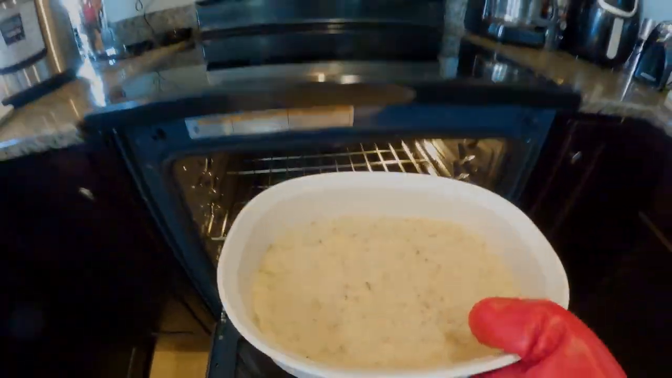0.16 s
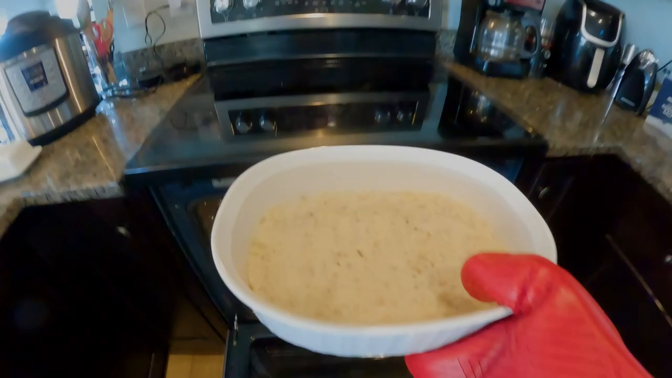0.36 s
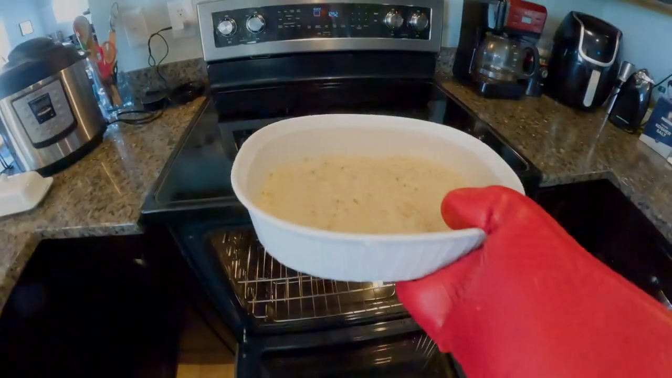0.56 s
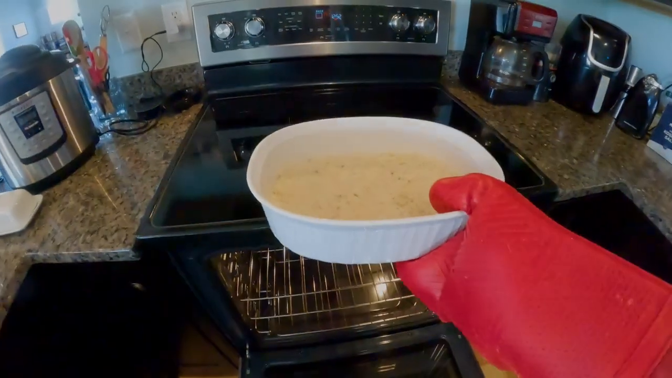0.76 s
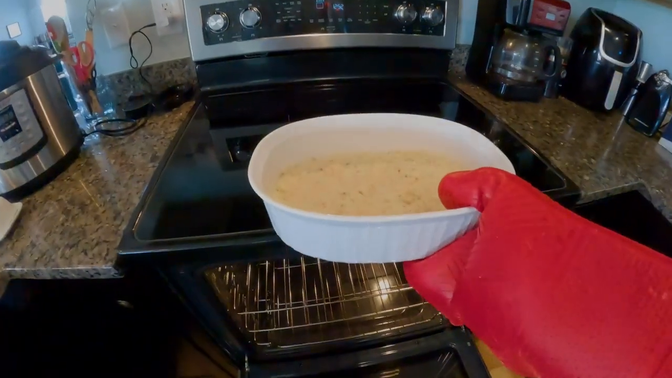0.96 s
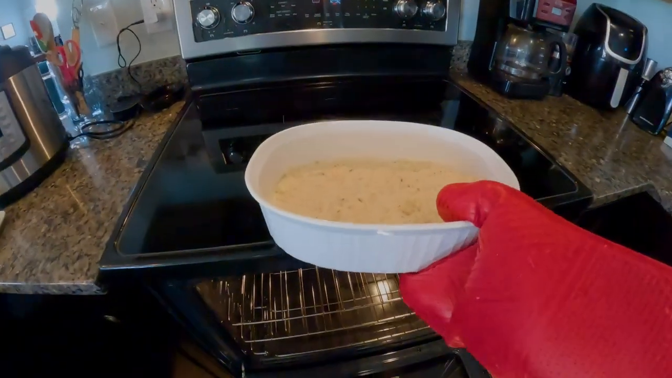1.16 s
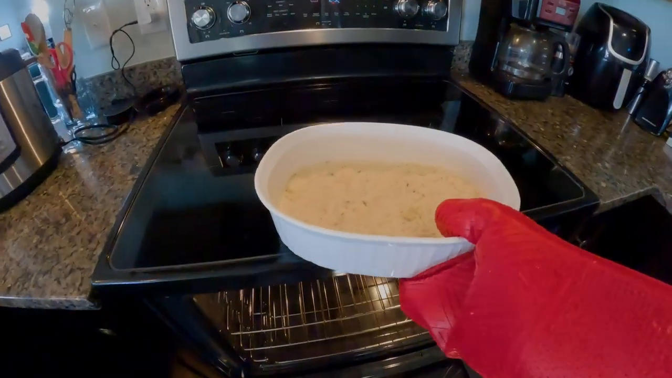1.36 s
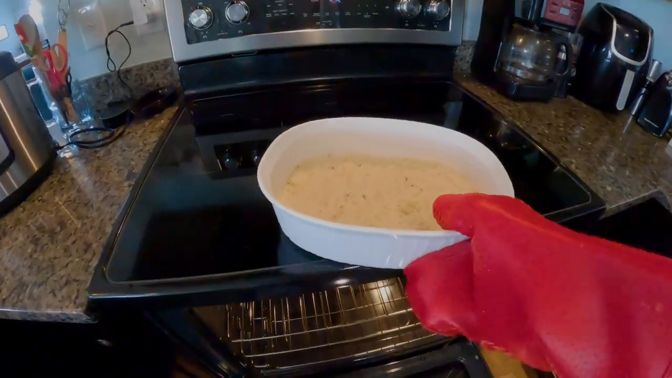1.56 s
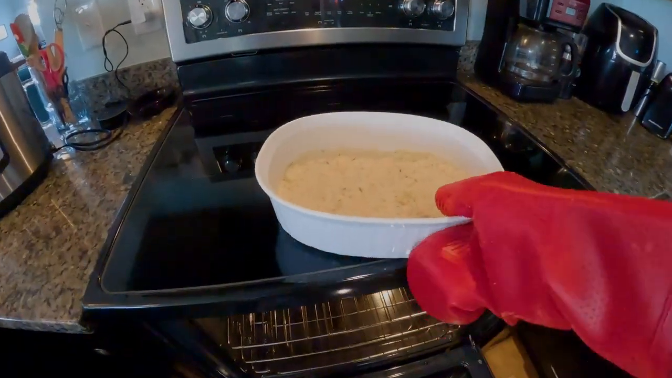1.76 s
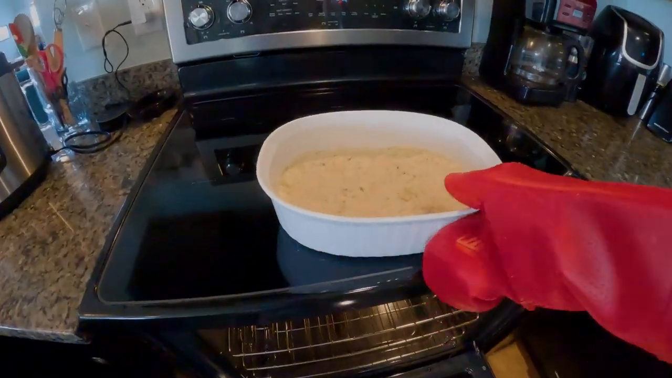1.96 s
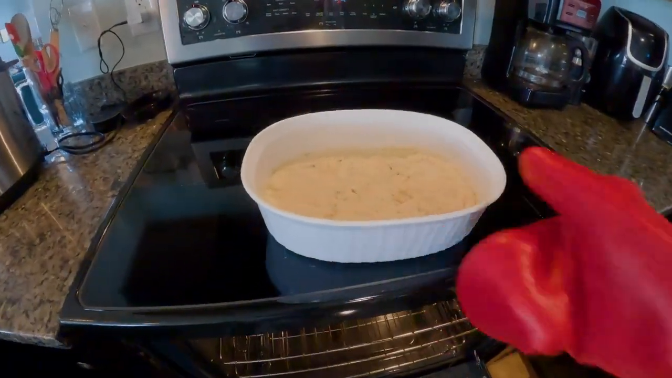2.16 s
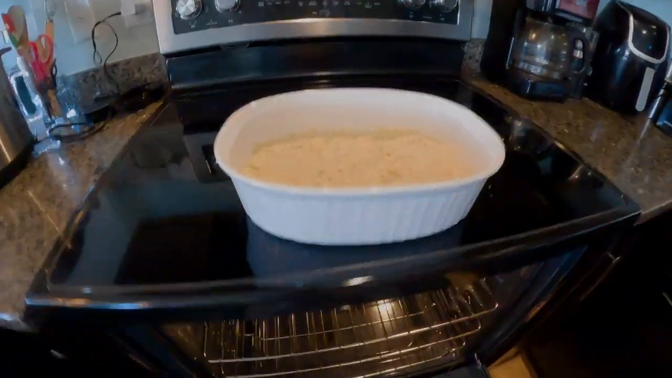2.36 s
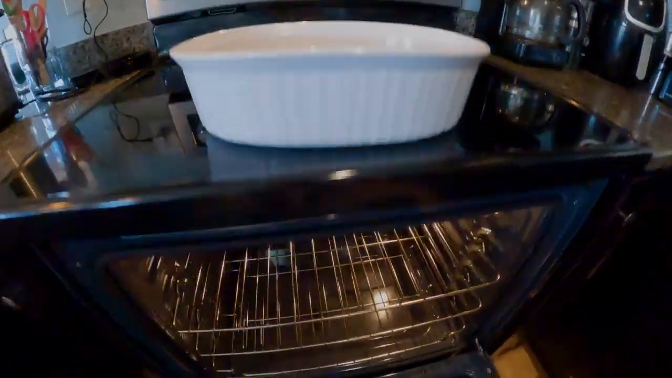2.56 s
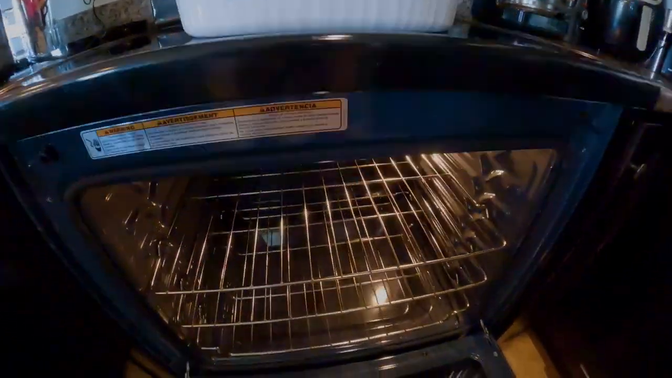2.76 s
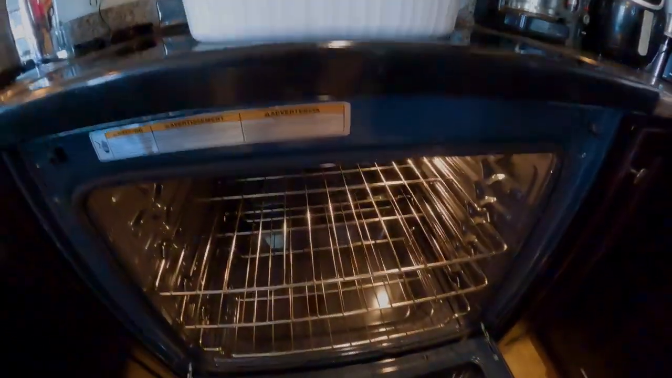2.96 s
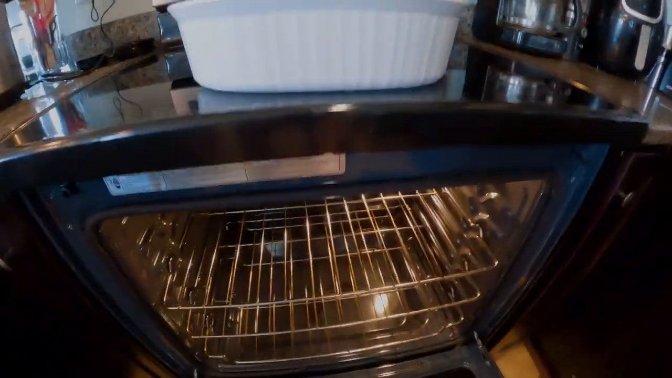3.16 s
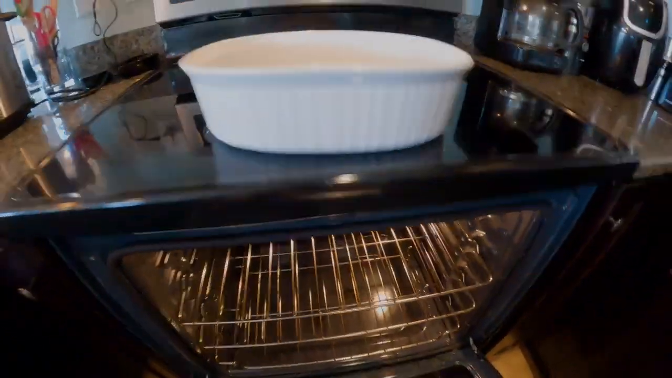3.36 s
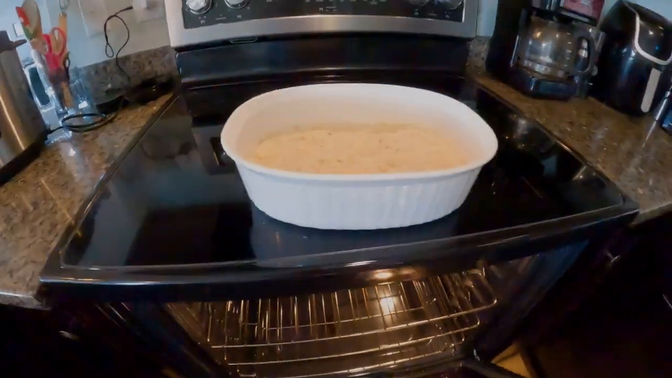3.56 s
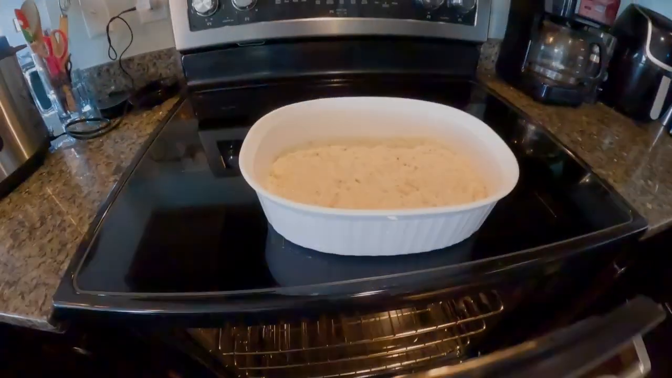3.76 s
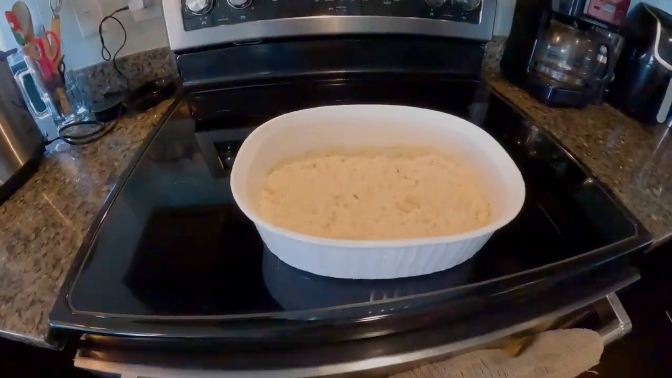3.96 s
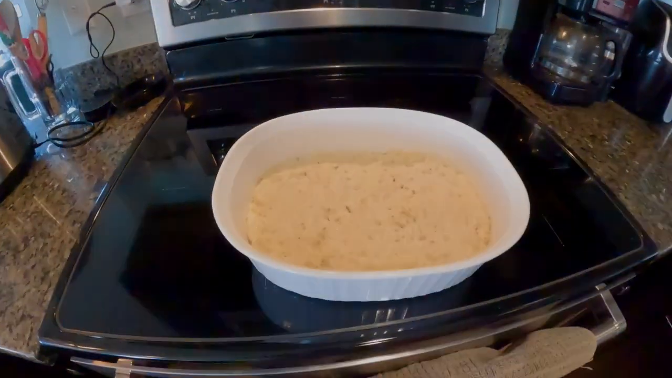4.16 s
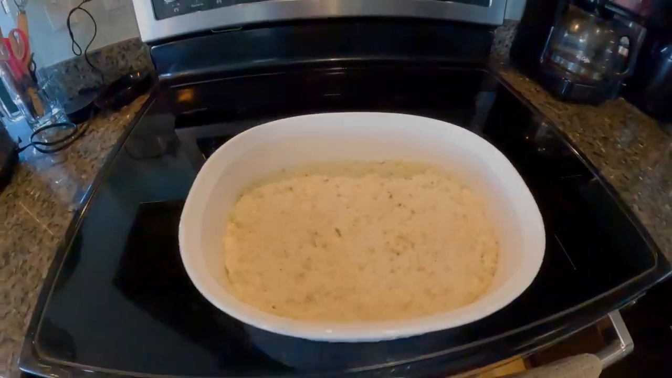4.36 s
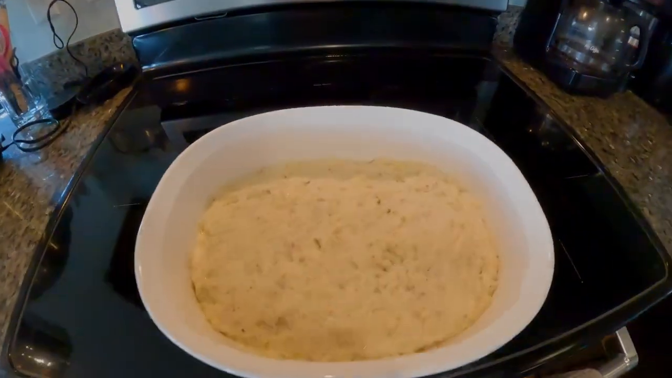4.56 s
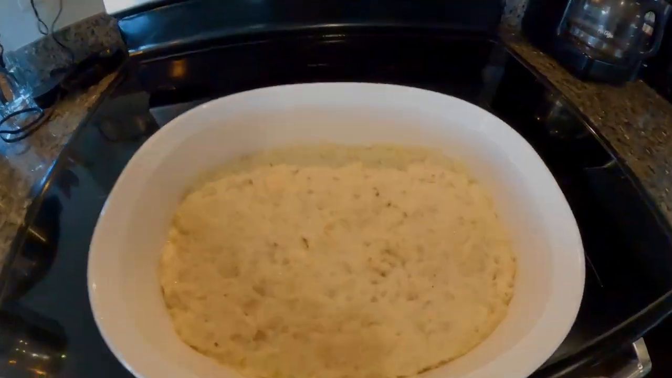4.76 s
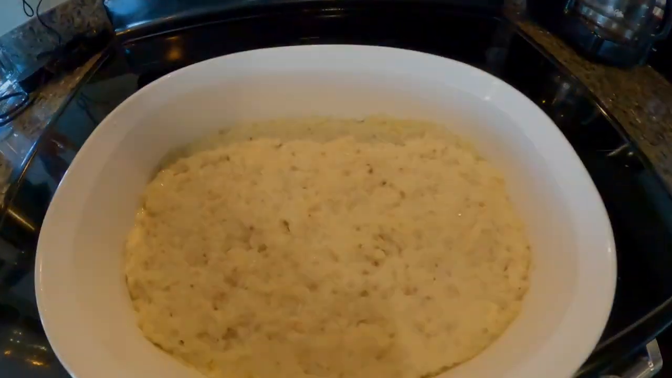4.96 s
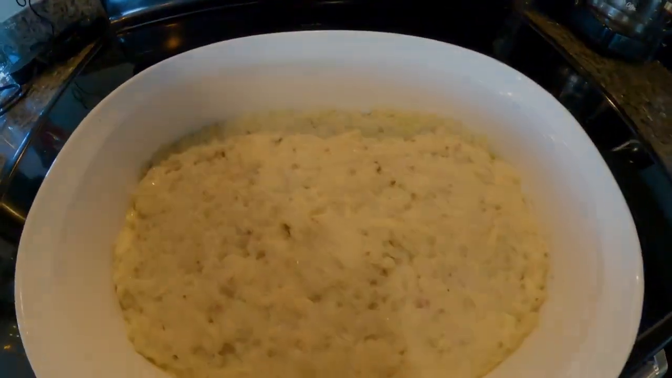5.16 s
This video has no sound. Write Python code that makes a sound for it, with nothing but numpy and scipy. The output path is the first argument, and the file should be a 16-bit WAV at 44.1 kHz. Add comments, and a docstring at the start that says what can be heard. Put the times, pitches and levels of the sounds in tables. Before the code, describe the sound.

A wire oven rack rings and fades, with faint ticks as a ceramic dish is carried away. The dish lands on a glass cooktop with a sharp knock, scrapes briefly and rocks with a few more knocks. Then the oven door's hinge clacks, and the door rattles and shuts with a deep push of air. A body-worn microphone hears it up close in a small kitchen, over low rumble, a drone and soft hiss.

```python
"""Dish out of the oven

A wire rack rings out as a ceramic dish is carried from it, ticking faintly. The dish lands, rocks and
slides on a glass cooktop; then the oven door is lifted, its hinge clacks and it shuts with a push of air.
Blows ring the modes of the struck parts; friction is noise through resonances. A body-worn microphone
hears it in a small kitchen, over rumble, a low drone and a hissy wash."""
import sys
import numpy as np
from scipy import signal
from scipy.fft import rfft, irfft, next_fast_len
from scipy.io import wavfile
from scipy.ndimage import map_coordinates

SR = 44100
rng = np.random.default_rng(int(sys.argv[2]) if len(sys.argv) > 2 else 0)


def unload_audio(sound):
    """Save the sound as a 16-bit wav file, at the path given as the first command line argument."""
    columns = np.transpose(np.atleast_2d(sound))
    # keep every value between -1 and 1, then stretch to whole-number steps
    steps = np.round(np.clip(columns, -1, 1) * 32767)
    wavfile.write(sys.argv[1], SR, steps.astype(np.int16))


N = 230598
T = np.arange(N) / SR


def amp(db):
    """Gain of a level in dB."""
    return 10 ** (np.asarray(db) / 20)


def sides(pan_db):
    """Left and right gains; positive pan is left."""
    return amp([[pan_db / 2], [-pan_db / 2]])


def along(points, hz):
    """Interpolates (Hz, value) points on a log axis."""
    f, v = np.transpose(points)
    return np.interp(np.log(hz + 1), np.log(f + 1), v)


def fader(points, outside_db=None):
    """Gain over time from (s, dB) points."""
    return amp(np.interp(T, *np.transpose(points), left=outside_db, right=outside_db))


def swell(centre_s, sigma_s, db):
    """Bell-shaped gain over time."""
    return amp(db) * np.exp(-.5 * ((T - centre_s) / sigma_s) ** 2)


def flicker(db, rate_hz):
    """Smooth random gain, spread by about db."""
    knots = rng.standard_normal(int(N * rate_hz / SR) + 4)
    return amp(db * map_coordinates(knots, [T * rate_hz]))


def filtered(x, response):
    """Applies a gain given as a function of Hz."""
    n = x.shape[-1]
    size = next_fast_len(n + 8192)
    return irfft(rfft(x, size) * response(np.fft.rfftfreq(size, 1 / SR)), size)[..., :n]


def resonance(hz, centre_hz, width_hz):
    """Gain of one resonant peak."""
    return 1 / (1 + (2 * (hz - centre_hz) / width_hz) ** 2)


def band(hz, centre_hz, width_oct):
    """Gain of a flat-topped band."""
    return 1 / (1 + (2 * np.log2((hz + 1) / centre_hz) / width_oct) ** 4)


def peaks(table, hz, floor_db):
    """Gain of (Hz, width, dB) resonances over a floor, rolled off in the bass."""
    resonant = sum(amp(db) * resonance(hz, centre, width) for centre, width, db in table)
    return (amp(floor_db) + resonant) / (1 + (700 / (hz + 1)) ** 2)


def ring(modes, t, spread_db=1.5):
    """Decaying (Hz, dB, t60) sines at scattered strengths."""
    return sum(amp(db + spread_db * rng.standard_normal() - 60 * t / t60) * np.sin(2 * np.pi * hz * t)
               for hz, db, t60 in modes)


def add(out, start_s, x):
    """Mixes x into both channels."""
    span = out[:, round(start_s * SR):][:, :x.shape[-1]]
    span += x[..., :span.shape[1]]


def stereo_noise(n, mid_side_gain):
    """Shaped mid and side noise as left and right, rms 1."""
    mid, side = filtered(rng.standard_normal((2, n)), mid_side_gain)
    x = np.array([mid + side, mid - side])
    return x / np.sqrt(np.mean(x ** 2) + 1e-20)


# Each row: frequency in Hz, left-right correlation.
CORRELATION = [(60, 0.89), (240, 0.97), (950, 0.74), (3770, 0.55), (15000, 1)]
def rush(gain):
    """Scene-long noise, partly alike in both channels."""
    def mid_side_gain(hz):
        angle = np.arccos(np.clip(along(CORRELATION, hz), -1, 1)) / 2
        return gain(hz) * [np.cos(angle), np.sin(angle)]
    return stereo_noise(N, mid_side_gain)


# Each row: frequency in Hz, side against mid in dB.
SIDE_LEVEL = [(60, -21), (110, -34.5), (200, -27), (380, -16), (700, -15), (1290, -12), (2380, -8),
              (4400, -9.5), (8120, -15), (15000, -2)]
def burst(n, gain):
    """n samples of stereo noise, nearly mono in the bass."""
    return stereo_noise(n, lambda hz: gain(hz) * amp([0 * hz, along(SIDE_LEVEL, hz)]))


# Each row: frequency in Hz, level in dB, t60 in seconds.
RACK_MODES = [(668, -12, 7), (791, -14, .6), (921, -19, 1.2), (1120, -14, .7), (1303, -13, 2.2),
              (1461, -15, 5), (2406, -15, .9), (2191, -20, .8), (3068, -15, .9), (3155, -16, .9),
              (3693, -14, .9), (4425, -8, 1.1), (4947, -18, 1), (5044, -15, 1.4), (5701, -19, .8),
              (5862, -15, .9), (5908, -16, .9), (6621, -24, 1.2), (6745, -19, 1), (6880, -19, .9),
              (7337, -18, 2.4), (7472, -18, .8), (8473, -20, .9), (9205, -18, .9), (9394, -17, .8),
              (9690, -17, .9), (10960, -23, .9), (11547, -17, 1.2), (11698, -19, .9), (12457, -17, .8)]
def rack():
    """The rack, struck just before the start: wires of nearly equal length beat as they fade."""
    out, t = np.zeros((2, N)), T[:3 * SR // 2]
    wire = np.arange(10)[:, None]
    for hz, db, t60 in RACK_MODES:
        wire_hz = hz * (1 + .002 * wire * rng.standard_normal(wire.shape))
        level = amp(db - 35 - 7.5 * np.sqrt(wire) - 60 * t * (1 + .15 * wire) / t60)
        tones = level * np.sin(2 * np.pi * (wire_hz * t + rng.uniform(0, 1, wire.shape)))
        pans = sides(1) * amp(2.5 * rng.standard_normal((1, len(wire))) * [[1], [-1]])
        add(out, 0, pans @ tones)
    return out


def rack_ring_and_swell(t60_s=2.56):
    """The rack's narrow 1280 Hz ring fades from the start; a faint tone at that pitch swells later."""
    level = amp(-44.5 - 60 * T / t60_s) + swell(centre_s=2.744, sigma_s=.17, db=-64)
    return level * rush(lambda hz: resonance(hz, 1280, width_hz=22))


# Each row: time in seconds, level in dB.
RUMBLE_LEVEL = [(0.0, -48), (0.03, -37.5), (0.36, -45), (1.35, -41.5), (1.37, -32), (1.53, -44),
                (3.13, -40), (3.16, -30), (3.29, -41), (4.05, -33.5), (4.11, -41), (4.14, -23.5),
                (4.22, -22.5), (4.78, -35.5), (4.81, -34), (5.23, -37)]
# Each row: frequency in Hz, density in dB.
RUMBLE_SPECTRUM = [(8, -36), (15, -0.5), (48, -10.5), (65, -15), (90, -18), (150, -49.5), (300, -120)]
def rumble():
    """Lumpy buffeting on the microphone ports."""
    return fader(RUMBLE_LEVEL) * flicker(2.7, 18) * rush(lambda hz: amp(along(RUMBLE_SPECTRUM, hz)))


# Each row: time in seconds, drone level in dB, wash level in dB.
BACKGROUND_LEVELS = [(0.0, -36.5, -36), (0.49, -51, -62), (0.93, -55.5, -65.5), (1.38, -58, -80),
                     (1.51, -48.5, -33.5), (1.79, -38, -43), (2.04, -51.5, -56), (2.27, -60, -68.5),
                     (2.49, -68.5, -72), (2.74, -61, -63), (3.16, -59, -67.5), (3.29, -48.5, -57),
                     (3.79, -52.5, -55), (3.96, -45, -57), (4.15, -41.5, -56.5), (4.31, -42.5, -48.5),
                     (4.6, -53.5, -70.5), (5.23, -55.5, -64.5)]
# Three spectra. Each row: frequency in Hz, density in dB.
DRONE_SPECTRUM = [(60, -25.5), (110, 1.5), (160, 3), (240, -3.5), (330, -9), (900, -21.5), (1800, -30.5),
                  (3000, -64.5)]
WASH_SPECTRUM = [(300, -46), (900, 0.5), (1700, -0.5), (3000, -9.5), (5000, -13), (9000, -40)]
HISS_SPECTRUM = [(1000, -16), (3000, 6.5), (7000, 5), (12000, 4.5), (16000, -1)]
# Each row: centre in seconds, sigma in seconds, level in dB.
HISS_SWELLS = [(0.951, 0.43, -68), (2.106, 0.12, -54), (2.837, 0.2, -59), (3.635, 0.23, -59.5),
               (4.303, 0.22, -58), (4.75, 0.23, -67)]
def drone_and_wash(hiss_share_db=-13.5, hiss_floor_db=-82):
    """A low drone and a hissy wash linger after the blows, with faint cloth rustle between them."""
    times, *levels = np.transpose(BACKGROUND_LEVELS)
    drone_db, wash_db = (np.interp(T, times, db) for db in levels)
    drone = amp(drone_db) * flicker(1.9, 28) * rush(lambda hz: amp(along(DRONE_SPECTRUM, hz)))
    wash = amp(wash_db) * rush(lambda hz: amp(along(WASH_SPECTRUM, hz)))
    swells = sum(swell(*row) for row in HISS_SWELLS)
    hiss_gain = amp(wash_db + hiss_share_db) + amp(hiss_floor_db) + swells
    hiss = hiss_gain * rush(lambda hz: amp(along(HISS_SPECTRUM, hz)))
    return drone + flicker(1.2, 90) * (wash + hiss)


# Each row: centre in Hz, width in Hz, level in dB.
CAVITY_TONES = [(230.1, 15, -58), (658, 170, -57.5), (658, 2.9, -64), (1446, 51, -63.5)]
# Each row: time in seconds, gain in dB.
OVEN_NEARNESS = [(0, 13), (1.3, -9), (2.2, -11), (2.35, -11.5), (2.7, -14.5), (3.1, -12.5), (4, -2.5),
                 (5.23, -27)]
def oven_hum():
    """Noise in the cavity's resonances, louder when the open oven is near."""
    hum = sum(amp(db) * rush(lambda hz: resonance(hz, centre, width))
              for centre, width, db in CAVITY_TONES)
    return fader(OVEN_NEARNESS) * hum


# Each row: start in seconds, level in dB, centre in Hz, pan in dB.
SINGLE_TICKS = [(0.609, -43, 8400, 1), (1.034, -49, 6400, 3), (1.765, -27, 11500, -2),
                (1.78, -27, 11700, -5), (1.8, -45, 11500, -7), (1.828, -31, 10100, -6.5),
                (1.837, -35, 10000, 16), (2.258, -39, 6500, 1), (2.331, -48, 5000, 8.5),
                (2.92, -49, 5800, -1), (3.235, -18.5, 1070, 2), (3.604, -41, 9050, .6)]
def ticks(run_start_s=.35, gap_s=.057, run_t60_s=.042, single_t60_s=.026):
    """Band-limited clicks: a faint, nearly even run while the dish is carried, and single ones."""
    out, t = np.zeros((2, N)), np.arange(SR // 10) / SR
    run = [(run_start_s + k * gap_s + .012 * late, -54.5 + 1.5 * loud, 9000 * 1.4 ** high,
            1.5 + 2.4 * left) for k, (late, loud, high, left) in enumerate(rng.standard_normal((14, 4)))]
    attack = 1 - np.exp(-t / .0025)
    for rows, t60 in (run, run_t60_s), (SINGLE_TICKS, single_t60_s):
        for start_s, db, centre_hz, pan_db in rows:
            click = burst(len(t), lambda hz: band(hz, centre_hz, width_oct=1))
            add(out, start_s, sides(pan_db) * amp(db - 60 * t / t60) * attack * click)
    return out


# Each row: time in seconds, level in dB.
RUB_LEVEL = [(.57, -86), (.6, -59.5), (.87, -60), (.93, -87)]
def glove_rub():
    """The glove shifts on the rim of the dish."""
    return fader(RUB_LEVEL, outside_db=-120) * rush(lambda hz: band(hz, 2200, width_oct=2.02))


def knocks(blows, plate_modes, part_modes, ring_db, width_hz, crack_db_oct, rise_s):
    """Each blow: a treble crack, a noisy clack in the part's modes, their ring and the plate's thud."""
    out, t = np.zeros((2, N)), np.arange(SR // 3) / SR
    clack_peaks = [(hz, width_hz, db) for hz, db, _ in part_modes]
    attack, thud_attack = 1 - np.exp(-t / rise_s), 1 - np.exp(-t / .0025)

    def crack_gain(hz):
        return amp(crack_db_oct * np.log2(hz / 4000 + .01)) / (1 + (1800 / (hz + 1)) ** 4)

    def clack_gain(hz, db_oct):
        midrange = 1 / (1 + (300 / (hz + 1)) ** 4) / (1 + (hz / 1900) ** 4)
        return peaks(clack_peaks, hz, floor_db=-8) * amp(db_oct * np.log2(hz / 1000 + .1)) * midrange

    for start_s, clack_db, db_oct, crack_db, thud_db, t60, pan_db in blows:
        decay_db = -60 * t / t60
        crack = amp(crack_db) * burst(len(t), crack_gain)
        crack *= amp(decay_db) + 1.65 * amp(-60 * t / .0099)  # tail plus snap
        clack = amp(clack_db) * burst(len(t), lambda hz: clack_gain(hz, db_oct))
        clack *= amp(.76 * decay_db) + .52 * amp(-60 * t / .012)
        tilted = [(hz, db + db_oct * np.log2(hz / 1000), mode_t60) for hz, db, mode_t60 in part_modes]
        # The blow's decay adds to the modes' own damping.
        tones = amp(clack_db + ring_db + .28 * decay_db) * ring(tilted, t)
        thud = amp(thud_db + .24 * decay_db) * ring(plate_modes, t) * thud_attack
        add(out, start_s, sides(pan_db) * (attack * (crack + clack) + tones) + thud)
    return out


# Each row: start in seconds, clack in dB, its slope in dB per octave, crack in dB, thud in dB,
# crack t60 in seconds, pan in dB.
DISH_BLOWS = [(1.347, -28.5, 3.5, -33, -48.5, 0.045, 1), (1.358, -15, -2.5, -11.5, -12, 0.094, 0),
              (1.54, -22, -12, -27.5, -31, 0.087, 0), (1.562, -26, -4.5, -20, -22.5, 0.11, -0.5),
              (1.572, -19, -11.5, -43, -23.5, 0.1, 0), (1.93, -30, -5, -48, -29.5, 0.12, -1),
              (1.937, -22, -6, -24, -18, 0.063, 0), (1.946, -48, 5, -17.5, -20, 0.071, 1.5),
              (1.957, -30, -24, -46, -32, 0.033, 1.5), (2.146, -38, -12, -42, -53, 0.14, -0.5),
              (2.164, -40, -2.5, -51, -30.5, 0.048, 4), (2.299, -60, -5, -58, -36.5, 0.041, 2)]
# Cooktop and dish. Each row: frequency in Hz, level in dB, t60 in seconds.
GLASS_MODES = [(92, -9.5, 0.57), (130.7, -6.5, 0.065), (151.8, 5, 0.14), (174, -12, 0.071),
               (274.7, 3.5, 0.045), (370.7, -10, 0.15), (533.5, -13.5, 0.13)]
CERAMIC_MODES = [(690, -10, .06), (1163, 0, .2), (1534, -4, .12), (1836, -1, .15), (2498, -8, .1),
                 (2692, -7, .15), (3252, -12, .1)]
def dish_knocks():
    """The ceramic dish lands and rocks on the glass plate."""
    return knocks(DISH_BLOWS, GLASS_MODES, CERAMIC_MODES,
                  ring_db=-12.5, width_hz=61, crack_db_oct=-8.5, rise_s=.00054)


# Each row: time in seconds, level in dB.
DRAG_LEVEL = [(1.355, -73), (1.37, -28.5), (1.45, -28), (1.53, -34), (1.7, -64), (1.9, -80), (1.99, -45),
              (2.1, -51), (2.27, -60.5)]
# Each row: centre in Hz, width in Hz, gain in dB.
FOOT_RESONANCES = [(1152, 150, 2.5), (1800, 44, -1), (2448, 42, -2.5), (2650, 110, 1), (3620, 70, -7.5),
                   (3880, 44, -13.5), (4410, 46, -12), (5140, 39, -2), (5910, 46, -7), (7100, 71, -22.5)]
def dish_slide():
    """The foot drags on the glass; gritty friction excites the dish's resonances."""
    drag = fader(DRAG_LEVEL, outside_db=-120) * flicker(2.2, 200)
    return drag * burst(N, lambda hz: peaks(FOOT_RESONANCES, hz, floor_db=-11.5) / (1 + (hz / 8000) ** 2))


# Each row: centre in seconds, level in dB, sigma in seconds.
GLOVE_SLIPS = [(2.052, -39, 0.011), (2.128, -34.5, 0.011)]
# Each row: centre in Hz, width in Hz, gain in dB.
GLAZE_RESONANCES = [(2070, 730, 5.5), (3340, 100, 9), (4600, 470, -0.5), (5660, 230, -2), (7400, 400, -3.5),
                    (10700, 760, -29)]
def glove_squeaks():
    """The glove slips twice on the glaze."""
    slips = sum(swell(centre_s, sigma_s, db) for centre_s, db, sigma_s in GLOVE_SLIPS)
    return slips * burst(N, lambda hz: peaks(GLAZE_RESONANCES, hz, floor_db=-11))


# Each row: start in seconds, clack in dB, its slope in dB per octave, crack in dB, thud in dB,
# crack t60 in seconds, pan in dB.
DOOR_BLOWS = [(3.129, -39.5, 3, -47.5, -32, 0.3, 2.5), (3.141, -29, 6.5, -27.5, -26, .13, -1),
              (3.221, -27, 1, -18.5, -45, 0.082, 0), (3.706, -76, 0, -46.5, -61, 0.37, 1),
              (3.792, -23.5, 5.5, -21.5, -23, 0.082, -1), (3.811, -26, -5.5, -49, -20, 0.11, 0),
              (3.869, -19, -3, -16.5, -15, 0.11, -1), (3.88, -26, 0, -32.5, -11, .1, 4),
              (3.992, -24.5, -3, -32, -32.5, 0.04, -0.5), (4.054, -40, 9, -48, -50, 0.037, -.6),
              (4.087, -31, -3, -43.5, -31.5, 0.057, -1), (4.113, -41, -10, -53, -48, 0.045, 0),
              (4.13, -40, -7, -60, -37, 0.054, -7), (4.145, -37.5, 0, -32.5, -51, 0.16, -0.5),
              (4.189, -26, 1, -23, -19, 0.11, -2), (4.194, -21.5, 1.5, -18.5, -42, 0.18, 1),
              (4.34, -42.5, -7, -43.5, -49, 0.056, -6), (4.369, -38.5, -7.5, -51, -26.5, 0.058, -5.5),
              (4.49, -44.5, -2.5, -60, -40, 0.022, -14), (4.521, -43.5, -8, -54, -32, 0.027, -8),
              (4.597, -65, 2, -41.5, -43, 0.084, 1), (4.771, -45.5, -12, -68, -25.5, 0.022, -7),
              (4.796, -57, 2, -48.5, -57, 0.53, 2.5), (4.827, -46, 8.5, -44.5, -49.5, 0.086, 1.5),
              (5.106, -53.5, 7.5, -77, -41, 0.048, 4)]
# Door panel and frame. Each row: frequency in Hz, level in dB, t60 in seconds.
PANEL_MODES = [(83, -13.5, 0.39), (139.3, 0.5, 0.28), (187.4, 1.5, 0.057), (254, -10, 0.026),
               (363, -5.5, 0.041)]
FRAME_MODES = [(440, 6.5, 0.055), (575, 6, 0.14), (750, -8, 0.094), (983, -1.5, 0.15), (1117, -7.5, 0.18),
               (1358, -7, 0.24), (1616, -7, 0.3), (2390, -58, 0.073), (2950, -15, 0.079), (7300, -34, 0.15)]
def door_knocks():
    """Door, hinge and springs clack; the steel frame rings and the panel thuds."""
    return knocks(DOOR_BLOWS, PANEL_MODES, FRAME_MODES,
                  ring_db=-14, width_hz=260, crack_db_oct=-1.75, rise_s=.0013)


# Each row: start in seconds, frequency in Hz, level in dB, t60 in seconds.
PRESSURE_SWINGS = [(4.131, 26.6, -23.5, 0.35), (4.185, 30.4, -20.5, 0.65), (4.373, 47.4, -23.5, 0.39),
                   (4.519, 56.6, -22, 0.55)]
def air_push():
    """The door pumps the oven's air as it meets its seal."""
    out = np.zeros((2, N))
    for start_s, *mode in PRESSURE_SWINGS:
        add(out, start_s, sides(-1) * ring([mode], T[:SR], spread_db=0))
    return out


# Each row: frequency in Hz, t60 in seconds.
KITCHEN_DECAY = [(150, 0.82), (1500, 0.44), (8000, 0.31)]
def kitchen(x, delay_s=.004):
    """Room reverberation, treble dying first; a new noise tail every quarter second."""
    out, block = np.zeros((2, N)), SR // 4
    for start in range(0, N, block):
        hz, t, spectrum = signal.stft(burst(SR // 2, np.ones_like), SR, nperseg=256)
        decay = amp(-60 * t / along(KITCHEN_DECAY, hz)[:, None])
        _, tail = signal.istft(spectrum * decay, SR, nperseg=256)
        tail /= np.linalg.norm(tail[0])
        add(out, start / SR + delay_s, signal.fftconvolve(x[:, start:start + block], tail, axes=1))
    return out


def scene():
    """All sources; only knocks and ticks reverberate."""
    hits = dish_knocks() + door_knocks() + ticks()
    action = hits + amp(-9) * kitchen(hits) + dish_slide() + glove_squeaks() + rack() + air_push()
    return action + rumble() + drone_and_wash() + oven_hum() + rack_ring_and_swell() + glove_rub()


# Each row: frequency in Hz, gain in dB.
HOUSING_RESPONSE = [(20, 2.5), (5000, -3), (7300, -2), (8100, -16), (10000, -18.5), (12000, -14),
                    (13500, -27.5), (15600, -51.5)]
# Each row: frequency in Hz, left over right in dB.
HOUSING_PAN = [(5000, 0), (8000, 1.5), (12000, 4)]
def record(dry, ceiling=.92, top_hz=15650):
    """Peaks are rounded; the microphone housing dulls the treble, less on the left; cut at top_hz."""
    def housing(hz):
        db = along(HOUSING_RESPONSE, hz) + [[.5], [-.5]] * along(HOUSING_PAN, hz)
        return amp(db) * (hz < top_hz)
    rounded = dry / (1 + np.abs(dry / ceiling) ** 6) ** (1 / 6)
    return filtered(rounded, housing)


dry = scene()
out = record(dry)
unload_audio(out)
```